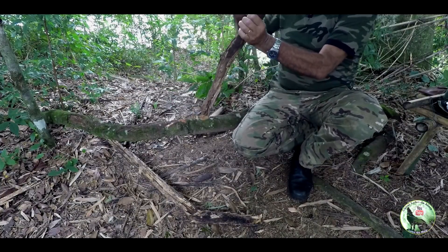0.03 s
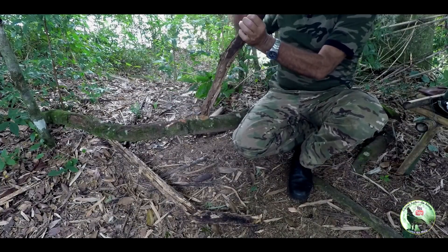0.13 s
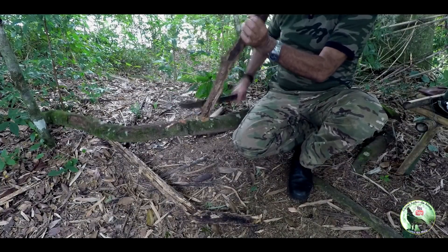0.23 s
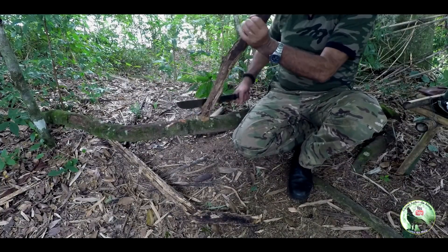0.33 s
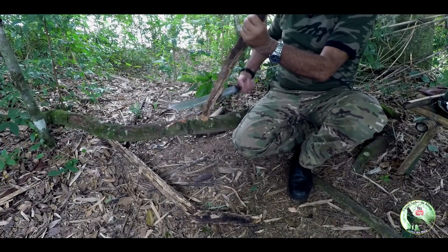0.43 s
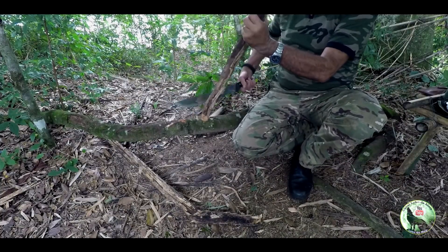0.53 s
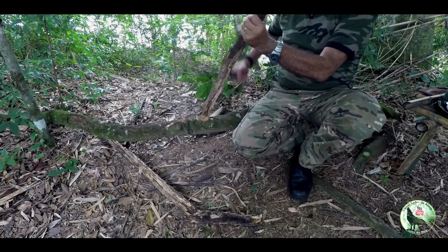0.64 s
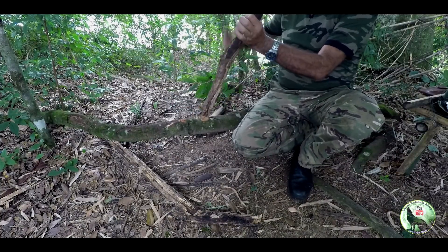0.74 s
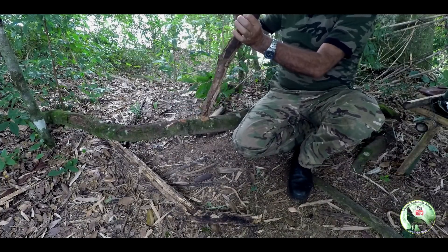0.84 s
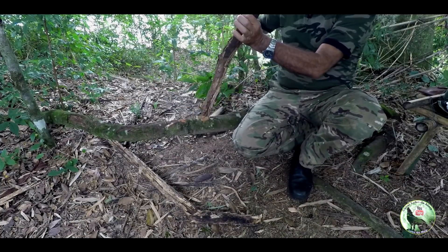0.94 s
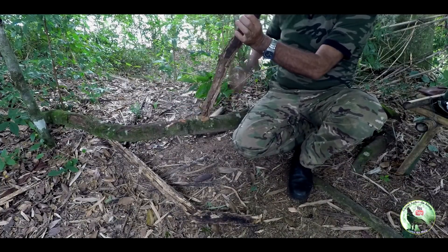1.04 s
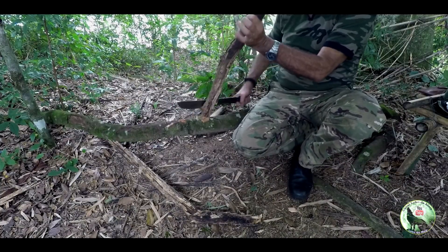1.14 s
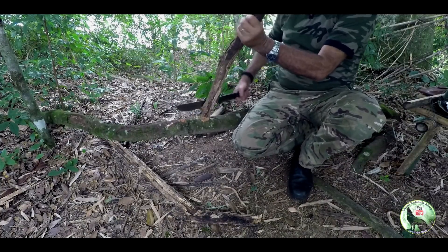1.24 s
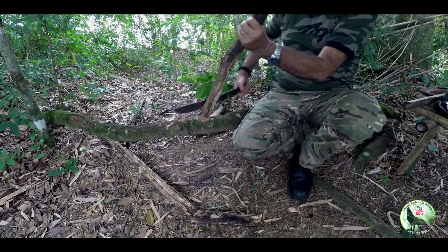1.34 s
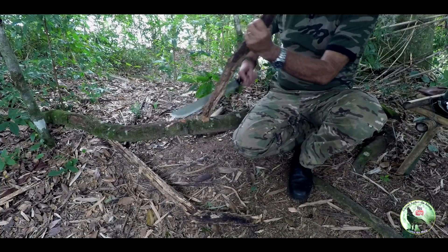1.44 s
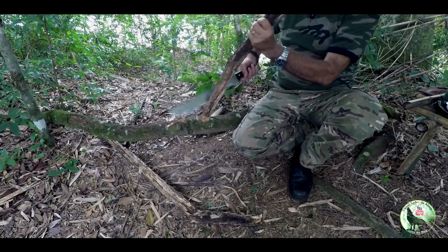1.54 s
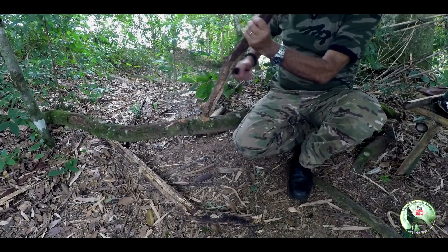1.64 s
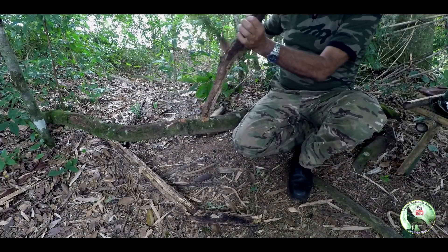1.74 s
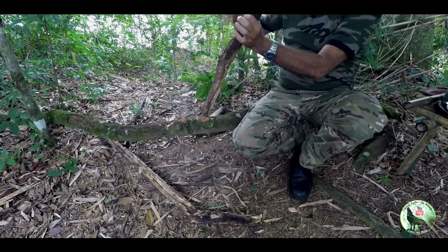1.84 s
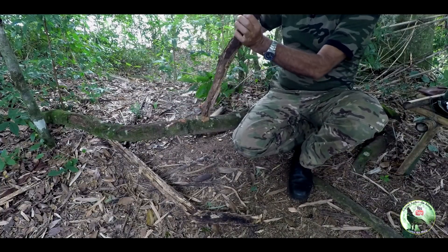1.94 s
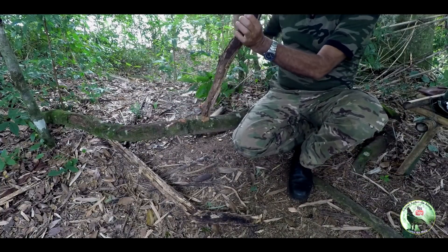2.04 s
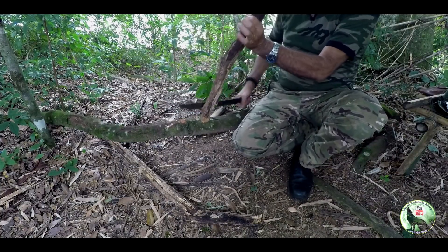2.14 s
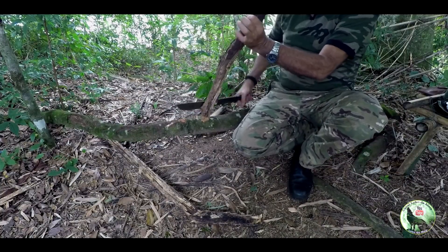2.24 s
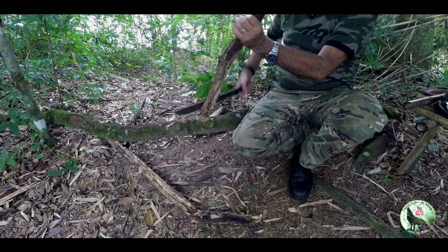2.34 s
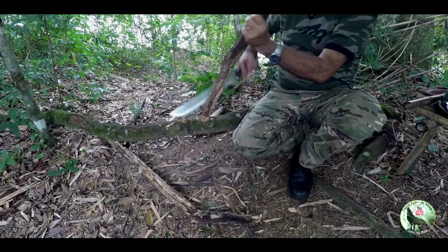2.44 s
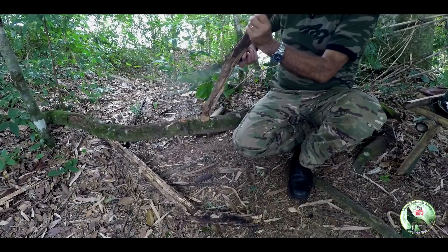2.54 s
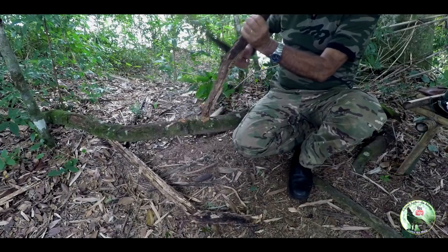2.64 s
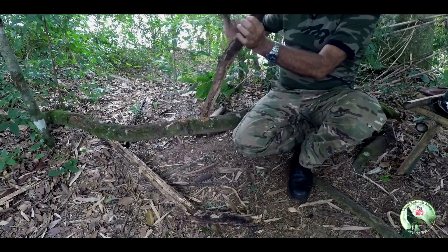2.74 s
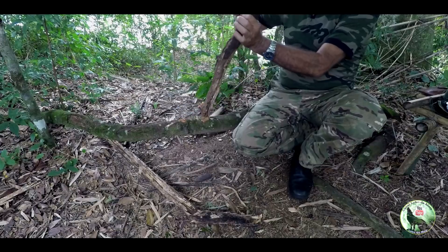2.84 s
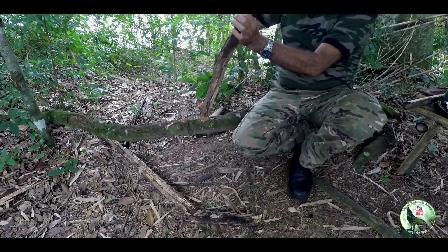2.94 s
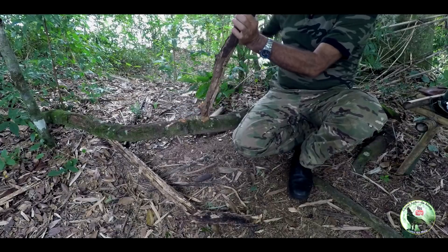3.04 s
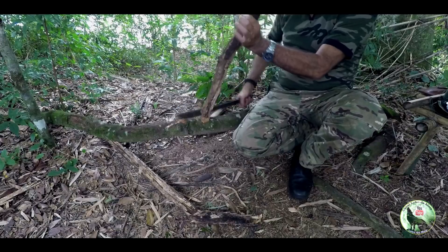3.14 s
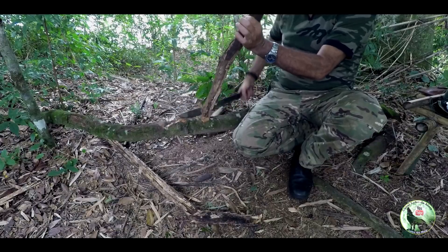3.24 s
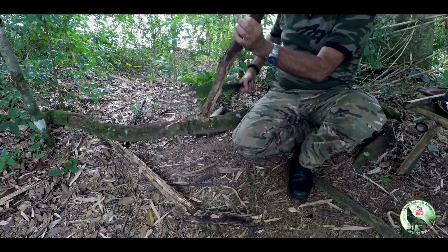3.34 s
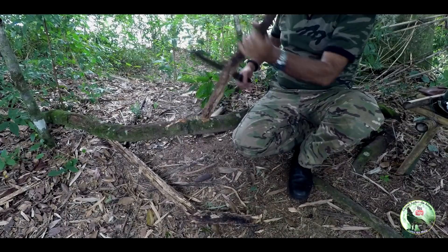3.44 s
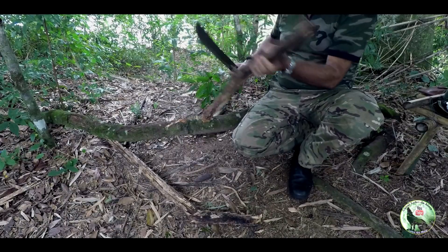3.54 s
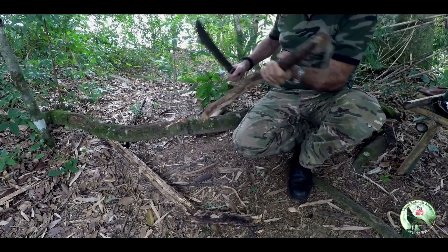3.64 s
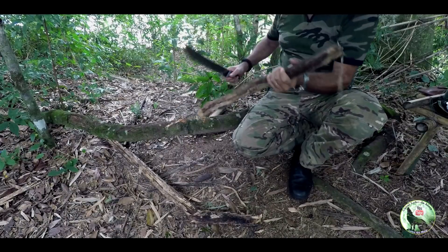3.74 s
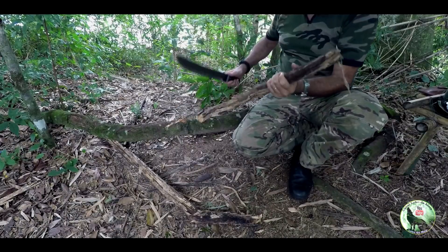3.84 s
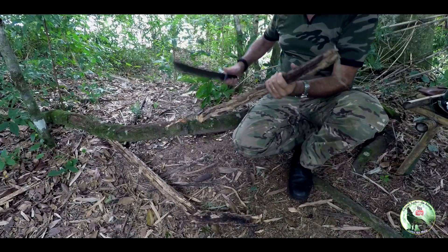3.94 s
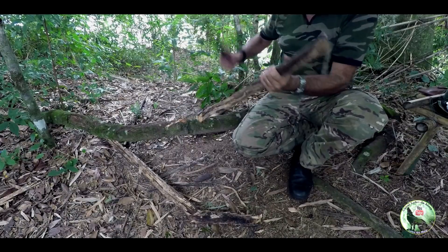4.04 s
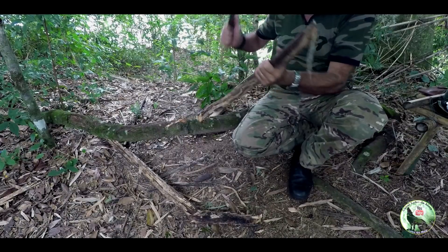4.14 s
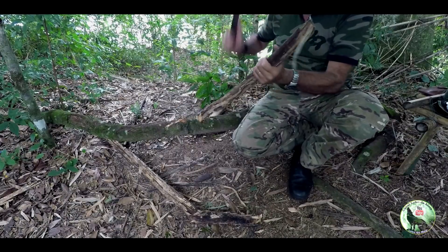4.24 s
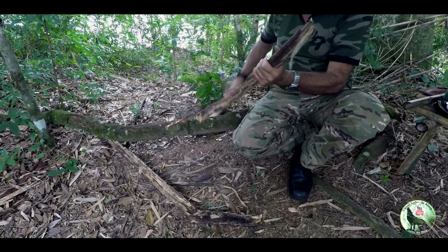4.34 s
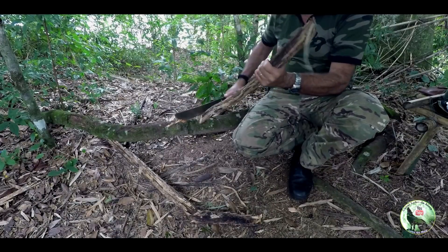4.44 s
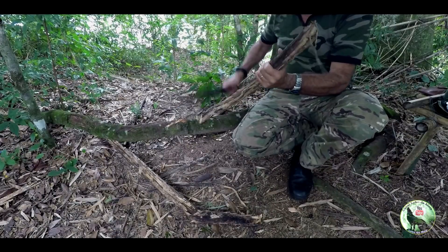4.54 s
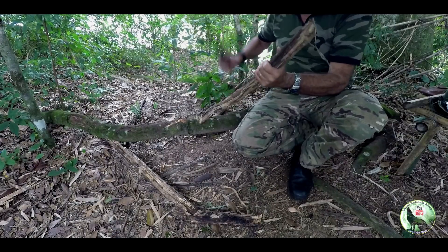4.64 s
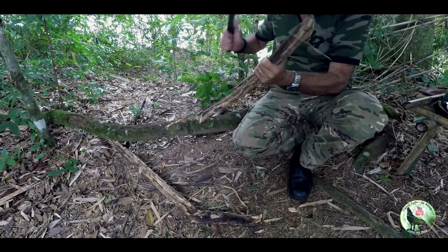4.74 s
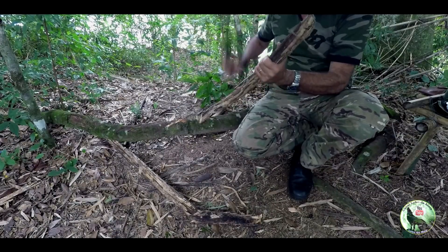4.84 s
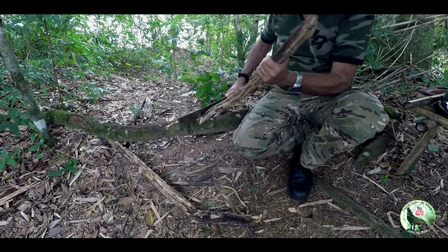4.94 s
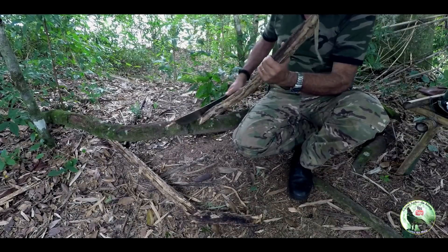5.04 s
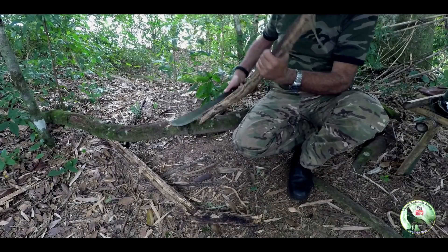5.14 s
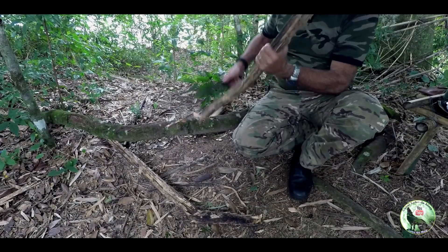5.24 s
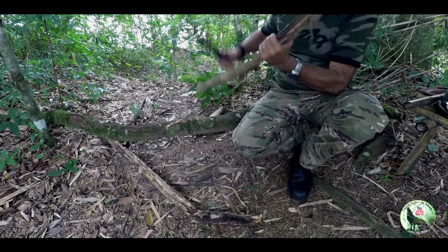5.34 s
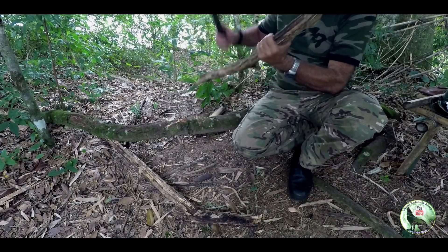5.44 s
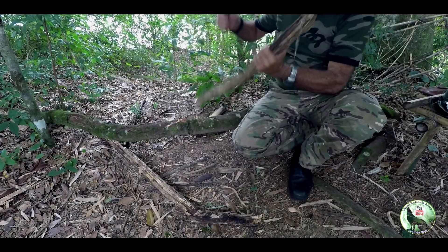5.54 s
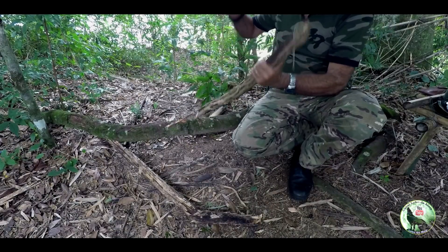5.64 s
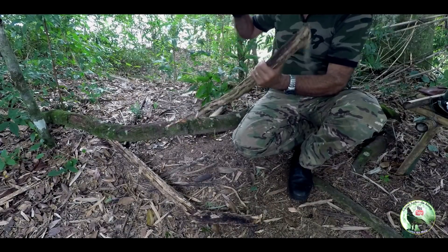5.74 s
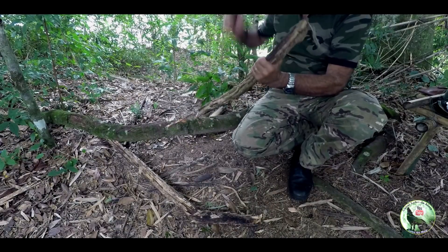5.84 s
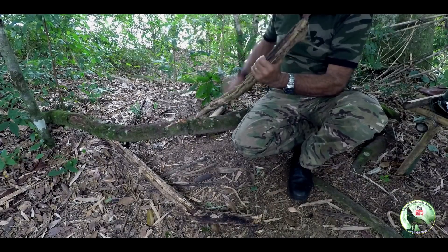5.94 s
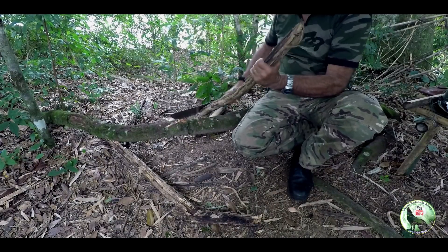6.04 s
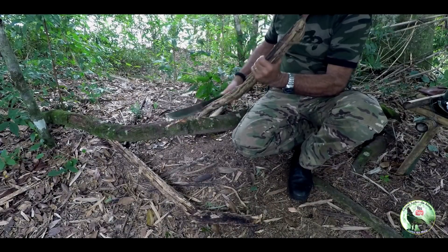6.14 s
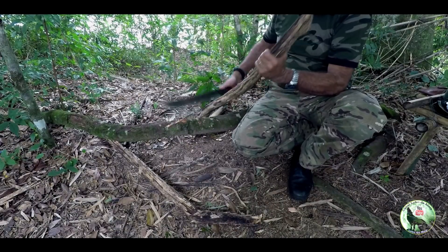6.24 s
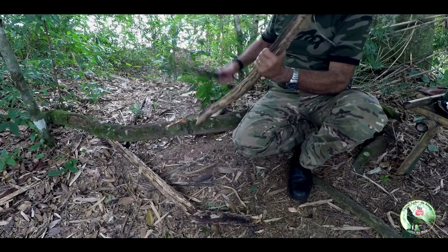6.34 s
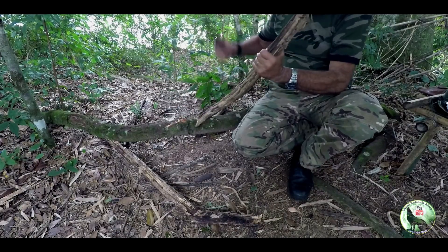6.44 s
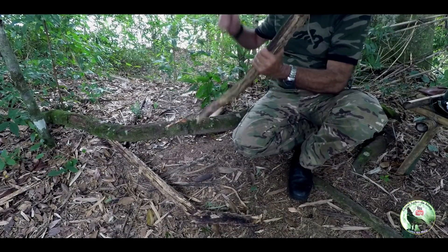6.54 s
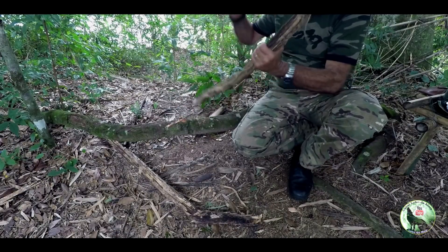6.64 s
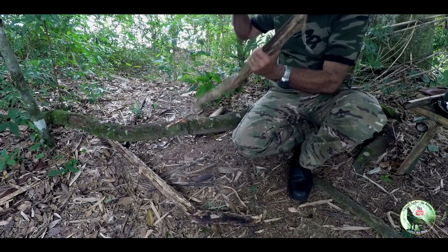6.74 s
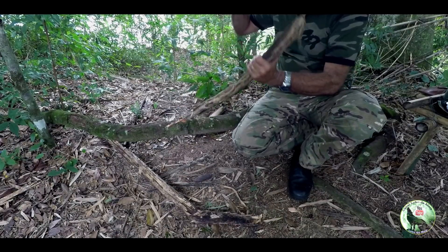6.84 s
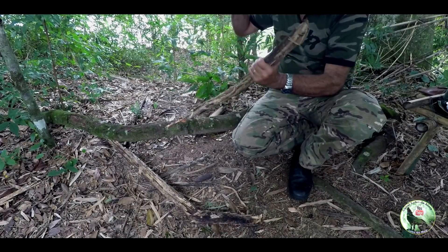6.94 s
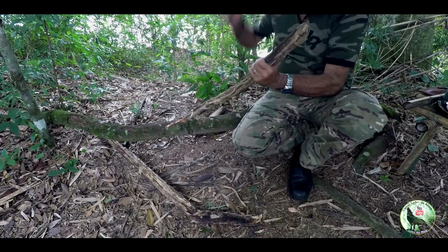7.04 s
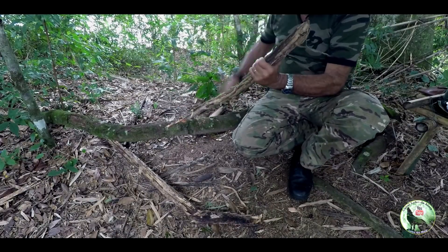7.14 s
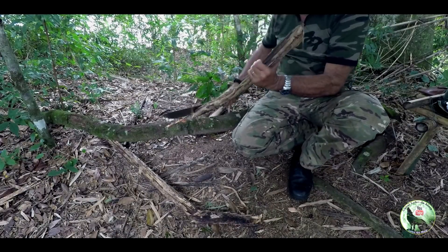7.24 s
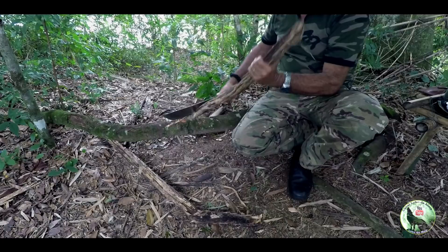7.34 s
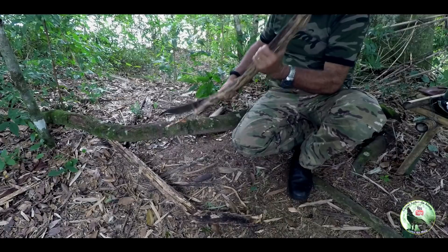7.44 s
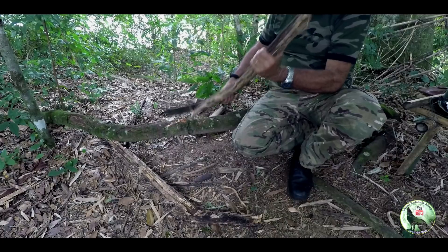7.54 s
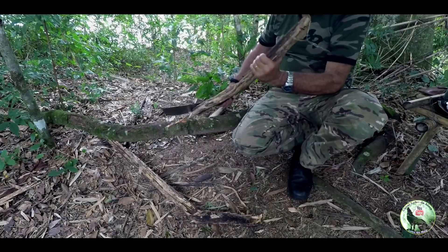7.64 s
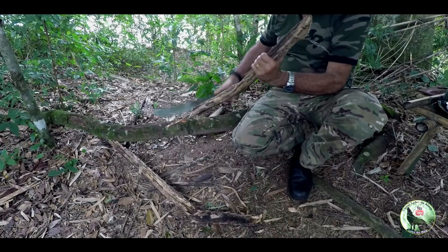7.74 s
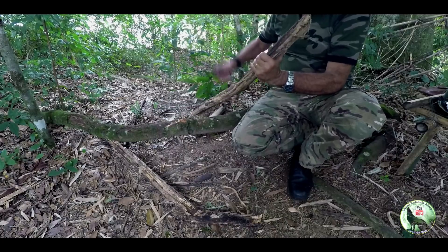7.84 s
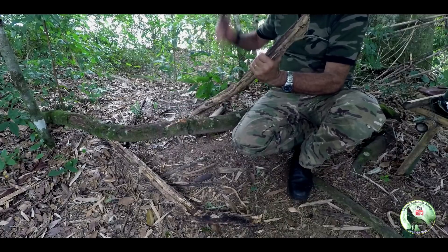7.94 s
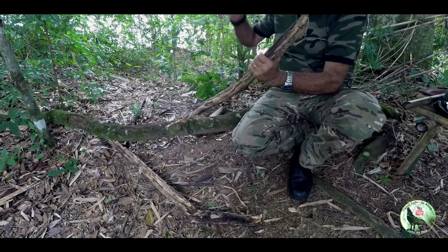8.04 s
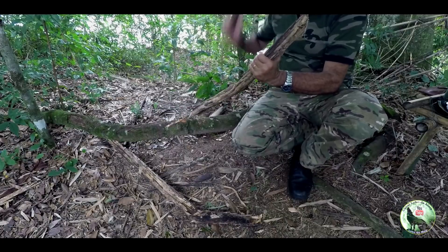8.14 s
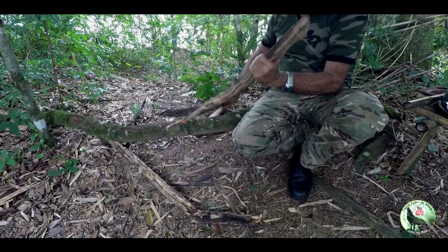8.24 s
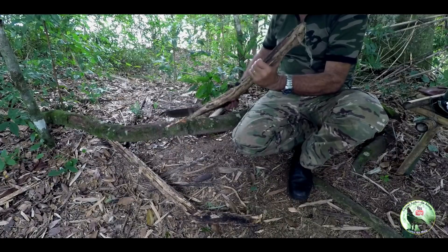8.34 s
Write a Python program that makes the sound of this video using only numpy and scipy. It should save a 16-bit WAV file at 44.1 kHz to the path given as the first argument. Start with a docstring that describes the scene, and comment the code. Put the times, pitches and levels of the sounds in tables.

```python
"""A low rumble and leaf hiss of a forest, shaped noise, last throughout while a machete swishes and chops a
hard stick that rests on a fallen log. Snapping fibres, as noise bursts, ring the stick; damped modes sound the
blade, log and ground; decaying noise is the trunks' answer. Filtered ticks and spiky noise are chips and crumbs
on dry leaves, and later the stick scraping, with one faint tick just before the fifth chop. The stick's end
knocks the log now and then, far birds whistle as gliding sines, and the microphone clips on the blows."""
import sys
import numpy as np
from scipy import signal
from scipy.fft import rfft, irfft, next_fast_len
from scipy.io import wavfile
from scipy.ndimage import map_coordinates

SR = 44100
rng = np.random.default_rng(int(sys.argv[2]) if len(sys.argv) > 2 else 0)


def wav_record(signal):
    """Record a signal, one row per channel, as 16-bit PCM in the file named by sys.argv[1]."""
    frames = np.transpose(np.atleast_2d(signal))
    bounded = np.clip(frames, -1, 1)
    # unit amplitude maps onto the largest positive 16-bit level
    quanta = np.round(bounded * 32767).astype(np.int16)
    wavfile.write(sys.argv[1], SR, quanta)


N = 369999  # samples in the scene


def amp(db):
    """Logarithmic level: decibels to an amplitude ratio."""
    return 10 ** (np.asarray(db) / 20)


def unit(x):
    """Normalisation to rms 1."""
    return x / np.sqrt(np.mean(x ** 2) + 1e-20)


def along(points, hz):
    """Interpolation of (f/Hz, value) points on a logarithmic frequency axis."""
    f, v = np.transpose(points)
    return np.interp(np.log(hz + 1), np.log(f + 1), v)


def filtered(x, response):
    """Linear filtering: the spectrum of x times a complex response of frequency."""
    m = next_fast_len(len(x) + 8192)
    spectrum = rfft(x, m) * response(np.fft.rfftfreq(m, 1 / SR))
    return irfft(spectrum, m)[:len(x)]


def peak(f, hz, width_hz):
    """Simple resonance: the causal response of one damped oscillator, 1 at its centre."""
    return 1j * f * width_hz / (hz * hz - f * f + 1j * f * width_hz)


def noise(n, spectrum):
    """Spectral shaping: white noise coloured by (f/Hz, level/dB) points, at rms 1."""
    return unit(filtered(rng.standard_normal(n), lambda f: amp(along(spectrum, f))))


def wobble(knots_per_s):
    """Slow fluctuation: a smooth random curve through random knots."""
    knots = rng.standard_normal(int(N * knots_per_s / SR) + 4)
    return map_coordinates(knots, [np.arange(N) * knots_per_s / SR])


def near(hz, centre, share=.06):
    """Frequency ratio: true within a logarithmic share of the centre."""
    return abs(np.log(hz / centre)) < share


def ring(modes, t, attack_s, spread_db, blur):
    """Modal decay: damped modes at new strengths for each blow; the grip blurs each by a wandering phase."""
    total = 0
    for hz, db, t60 in modes:
        phase = 2 * np.pi * hz * t + blur * np.sqrt(hz / SR) * np.cumsum(rng.standard_normal(len(t)))
        decay = amp(db + spread_db * rng.standard_normal() - 60 * t / t60)
        total = total + decay * np.sin(phase)
    return (1 - np.exp(-t / attack_s)) * total


def add(out, s, x):
    """Superposition: mix x into out from time s in seconds."""
    i = max(round(s * SR), 0)
    out[i:i + len(x)] += x[:len(out) - i]


# spectrum of the distant rumble: (f/Hz, relative level/dB)
RUMBLE = [(12, -30), (20, 6.5), (36, 4), (65, -2.5), (102, 0.5), (133, -3.5), (145, -18), (172, -8.5),
          (211, -22), (242, -20), (300, -20.5), (390, -49.5), (660, -120)]
# spectrum of the leaf hiss: (f/Hz, relative level/dB)
LEAVES = [(120, -33.5), (200, -1.5), (244, -10.5), (315, -7), (544, -8.5), (574, -10.5), (702, -10),
          (956, -12), (1090, -12), (2170, -16.5), (4100, -17), (5480, -19.5), (6700, -20), (7740, -26.5),
          (15500, -35)]
# slow level of a low drone: (t/s, rms level/dB)
DRONE = [(0, -51), (.67, -51), (2.0, -50.5), (2.7, -58), (3.9, -46.5), (4.8, -56), (6.8, -50), (7.4, -54),
         (8.39, -53.5)]
# slow level of a fainter hum above the drone: (t/s, rms level/dB)
HUM = [(0, -65.5), (3.5, -66.5), (3.9, -64), (5.0, -68), (5.5, -61), (6.3, -60), (6.7, -67), (8.39, -67)]
RUMBLE_DB, RUMBLE_GROWS_DB, HISS_DB = -51.5, 5, -55  # the rumble gains a little over the scene
DRONE_HZ, DRONE_WANDER_HZ = 101.4, 9


def forest():
    """Broadband and narrowband noise: a distant rumble, a wandering drone, a hum and a smooth hiss of leaves."""
    t = np.arange(N) / SR
    rumble_db = RUMBLE_DB + RUMBLE_GROWS_DB * t / t[-1] + 1.2 * wobble(2.5)
    rumble = amp(rumble_db) * noise(N, RUMBLE)
    # slow noise as the amplitude of a sine spreads it into a narrow band
    drone_hz = DRONE_HZ + DRONE_WANDER_HZ * wobble(2.1)
    slow = unit(filtered(rng.standard_normal(N), lambda f: 1 / (1 + (f / 22) ** 4)))
    drone = np.sqrt(2) * slow * np.sin(2 * np.pi * np.cumsum(drone_hz) / SR)
    drone *= amp(np.interp(t, *np.transpose(DRONE)))
    hum = unit(filtered(rng.standard_normal(N), lambda f: peak(f, 242, 25) ** 2))
    hum *= amp(np.interp(t, *np.transpose(HUM)))
    hiss = amp(HISS_DB + .4 * wobble(1.5)) * noise(N, LEAVES)
    return rumble + drone + hum + hiss


# whistled notes: (t/s, length/s, first f/Hz, last f/Hz, level/dB, hold before the faint tail/s)
BIRDS = [(.49, .08, 4350, 4450, -60, .03), (.5, .025, 4600, 4950, -60, .025),
         (.512, .23, 5295, 5300, -54, .1), (.572, .18, 4700, 2900, -63, .13),
         (2.455, .43, 5575, 5530, -51, .13), (2.51, .11, 6105, 6110, -66, .08),
         (4.48, .1, 4500, 4550, -63, .1), (4.5, .25, 5305, 5305, -58, .1), (4.58, .14, 4500, 2850, -64, .1),
         (7.76, .07, 6100, 6070, -69, .05), (7.76, .07, 6500, 6540, -69, .04)]
BIRD_TAIL_DB, BIRD_TAIL_S = -13, .04  # after the hold a note sinks to a faint tail


def birds():
    """Frequency modulation and scattering: thin gliding whistles with soft ends, smeared by the trees."""
    whistles = np.zeros(N)
    for s, length, first_hz, last_hz, db, held in BIRDS:
        t = np.arange(0, length, 1 / SR)
        ends = np.clip(np.minimum(t, length - t) / 0.0074, 0, 1)
        level_db = db + BIRD_TAIL_DB * np.clip((t - held) / BIRD_TAIL_S, 0, 1)
        rough = .012 + .075 * (first_hz - last_hz > 1000)  # long falling glides are hoarse
        hz = first_hz + (last_hz - first_hz) * t / length
        phase = np.cumsum(2 * np.pi * hz / SR + rough * rng.standard_normal(len(t)))
        add(whistles, s, np.sqrt(2) * ends * amp(level_db) * np.sin(phase))
    whistles *= amp(1.5 * wobble(60))
    t = np.arange(SR // 4) / SR
    tail = rng.standard_normal(len(t)) * amp(-60 * t / 0.28)
    smeared = signal.fftconvolve(whistles, tail / np.linalg.norm(tail))[:N]
    return whistles + amp(-5) * smeared


# chips and splinters landing, the stick scraping in the faint-crackle ticks after 6 s, and a faint tick just
# before the fifth chop: (t/s, level/dB, pitch f/Hz, relative bandwidth, crackle level/dB)
TICKS = [(0.4535, -22.5, 3440, 1.7, -20), (0.472, -24.5, 1170, 1.7, -24), (0.6185, -21.5, 5500, 0.53, -24),
         (.665, -38, 1500, 0.7, -12), (0.681, -44, 12000, 0.68, -7), (.763, -26, 4870, 0.59, -11),
         (0.8306, -38, 5970, 0.44, -15.5), (0.9314, -33.5, 2480, 1.7, -18), (1.4078, -17.5, 5950, 2.3, -23),
         (1.4345, -26, 3500, 1.7, -7), (1.446, -24.5, 2090, 2, -11), (1.465, -33, 1970, 0.15, -31),
         (1.487, -34, 1960, .4, -23), (2.4127, -33, 4000, 1, -6.5), (2.463, -31, 1290, 0.91, -18),
         (2.6494, -36.5, 4300, 0.48, -18), (3.2126, -20, 1500, 0.88, -14), (3.25, -18.5, 2160, 2.7, -27),
         (3.297, -29, 2180, 0.7, -25), (3.374, -26, 6640, .6, -17), (3.38, -22.5, 2200, 1.9, -24),
         (3.5612, -23, 4970, 0.24, -26), (3.856, -38, 1217, .2, -31), (4.388, -35, 3300, .5, -23),
         (4.437, -24, 5500, .6, -8), (4.716, -36.5, 6800, 0.61, -2.5), (5.1183, -29, 2660, 0.75, -19),
         (5.179, -32.5, 3450, 0.97, -20), (5.574, -31.5, 1900, 0.78, -16), (6.194, -36, 4260, 0.62, -12),
         (6.298, -25, 2070, 1.05, -35), (6.3693, -28, 2300, 0.76, -33), (6.373, -32, 1190, 0.23, -44),
         (6.404, -34, 2000, 1.1, -30), (6.4165, -28.5, 1950, 0.97, -32), (6.85, -44, 1810, 1.4, -8),
         (7.612, -26, 1490, 1.8, -33), (7.738, -34.5, 893, 0.72, -30.5), (7.7538, -37, 1310, 0.19, -36),
         (7.757, -29, 1700, 0.34, -31.5)]
TICK_CYCLES = 59  # the noise behind a tick dies 60 dB in this many cycles of its pitch


def ticks():
    """Impact excitation: a short noise tick resonates at its own pitch, with a broad crackle."""
    out, t = np.zeros(N), np.arange(SR // 8) / SR
    for s, db, hz, width, crackle_db in TICKS:
        tick = rng.standard_normal(len(t)) * amp(-60 * t * hz / TICK_CYCLES) * (1 - np.exp(-t / 0.0003))
        tick = filtered(tick, lambda f: peak(f, hz, 0.91 * width * hz) ** 2
                        + amp(crackle_db) * peak(f, 7200, 9000) ** 2)
        start_rms = np.sqrt(np.mean(tick[:130] ** 2))
        add(out, s, amp(db - 15) * tick / start_rms)
    return out


# showers of crumbs on the leaves: (t/s, level/dB, length/s, pitch f/Hz)
SHOWERS = [(0.44, -45.5, 0.061, 4000), (1.399, -47, 0.018, 4900), (1.417, -45.5, 0.051, 4270),
           (1.485, -51, .015, 4800), (2.439, -50.5, 0.033, 2540), (3.199, -36, 0.034, 5500),
           (3.37, -39, 0.038, 6340), (3.423, -56, 0.086, 7760), (3.531, -57, 0.037, 9800),
           (3.552, -49.5, 0.056, 4620), (3.688, -57.5, 0.095, 4980), (3.757, -54, 0.013, 8800),
           (6.22, -53, 0.069, 1600), (6.371, -50, 0.027, 2120), (7.62, -50.5, 0.02, 3010),
           (7.721, -57.5, 0.036, 2480)]


def crumbs():
    """Granular superposition: spiky, clumped noise through a broad resonance is a shower of tiny impacts."""
    out, n = np.zeros(N), SR // 8 * 2
    for s, db, length, hz in SHOWERS:
        spikes = rng.standard_normal(n) * amp(1.5 * rng.exponential(size=n))
        clumps = amp(2 * np.repeat(rng.standard_normal(n // 128 + 1), 128)[:n])
        grains = unit(filtered(spikes * clumps, lambda f: peak(f, hz, 1.3 * hz) ** 2))
        u = np.arange(n) / SR / length
        add(out, s, amp(db) * grains * np.minimum(u * 8, 1) / (1 + u ** 4))
    return out


# modes of the fallen log, before each blow's shifts: (f/Hz, level/dB, t60/s)
LOG = [(151.2, -2, 0.19), (217, -4.5, 0.071), (250, -6, 0.089), (316, -9.5, 0.052), (359, -3, 0.056),
       (421, -7.5, 0.08), (546, -2, .05), (778, -4, 0.017)]


def log_ring(t, attack_s, upper_db, spread_db, blur, favoured_hz=None):
    """Modal excitation: the blow sets the upper modes' level and may favour modes near one frequency by 5.5 dB."""
    modes = []
    for hz, level, t60 in LOG:
        favour_db = 5.5 * near(hz, favoured_hz, .14) if favoured_hz else 0
        modes.append((hz, level + upper_db * (hz > 190) + favour_db, t60))
    return ring(modes, t, attack_s, spread_db, blur)


# the stick's end set down on the log: (t/s, level/dB, contact/ms, log level/dB)
KNOCKS = [(3.853, -34, 0.56, -11.5), (5.64, -13.5, 0.25, -12), (6.831, -13, 0.61, -11.5),
          (7.612, -37.5, 0.47, -6)]


def knocks():
    """Contact time: one short blunt push rings the stick and the log, with a rough rattle after it."""
    out, t = np.zeros(N), np.arange(SR // 4) / SR
    for s, db, contact_ms, log_db in KNOCKS:
        push = np.exp(-((t - .001) / (contact_ms / 4000)) ** 2)
        tap = filtered(push, lambda f: peak(f, 2150, 880) - amp(5.5) * peak(f, 1070, 445))
        rattle = unit(filtered(rng.standard_normal(len(t)), lambda f: peak(f, 1440, 1210) ** 2))
        rattle *= amp(-60 * t / 0.079)
        thud = log_ring(t, 0.0035, upper_db=7.5, spread_db=4.0, blur=0.17)
        add(out, s, amp(db) * (tap / np.abs(tap).max() + amp(log_db) * thud + amp(-18.5) * rattle))
    return out


# spectrum of the near trunks' answer: (f/Hz, relative level/dB)
NEAR_TRUNKS = [(200, -14), (800, -4.5), (2000, -6), (4500, -4.5), (7000, -6.5), (10000, -14), (15000, -16)]
# spectrum of the far trunks' answer: (f/Hz, relative level/dB)
FAR_TRUNKS = [(200, -23.5), (800, -10), (2000, -4.5), (3200, -2), (4800, -1), (7000, -4), (10000, -11),
              (15000, -17)]


def echo(t, t60, bass_db, treble_db, body):
    """Scattering: near trunks die fast, far ones slowly, in uneven arrivals that keep the blow's colour."""
    uneven = amp(1.3 * map_coordinates(rng.standard_normal(64), [t * 110], mode="wrap"))
    colour = unit(signal.fftconvolve(noise(len(t), FAR_TRUNKS), body[:1200])[:len(t)])
    near_part = amp(-60 * t / (0.24 * t60)) * noise(len(t), NEAR_TRUNKS)
    far_part = amp(-16.5 - 60 * t / t60) * (noise(len(t), FAR_TRUNKS) + amp(-0.5) * colour) * uneven

    def tilt(f):
        treble_octaves = np.clip(np.log2(f / 5000 + .01), 0, 1.5)
        bass_octaves = np.clip(np.log2(3000 / (f + 1)), 0, 1.5)
        return amp(treble_db * treble_octaves + bass_db * bass_octaves)
    return (1 - np.exp(-(t / .002) ** 2)) * filtered(near_part + far_part, tilt)


# modes of the soil, before each chop's share of ring time: (f/Hz, level/dB, t60/s)
GROUND = [(44, -1, 0.97), (56.5, -2.5, 0.29), (65, 0, 0.58), (88, -5.5, 0.081)]


def ground_ring(t, ring_share):
    """Low-frequency modal decay: the soil swells slowly and booms under the log."""
    soil = [(hz, level, t60 * ring_share) for hz, level, t60 in GROUND]
    return ring(soil, t, .012, spread_db=4.0, blur=0.45)


def swish(t):
    """Eddy shedding: as the blade speeds up, its noise swells and rises in pitch."""
    low = unit(filtered(rng.standard_normal(len(t)), lambda f: peak(f, 700, 350) ** 2))
    high = unit(filtered(rng.standard_normal(len(t)), lambda f: peak(f, 1300, 650) ** 2))
    speed = t / t[-1]
    return speed ** 4.7 * ((1 - speed) * low + speed * high)


# modes of the steel blade: (f/Hz, level/dB, t60/s)
BLADE = [(1285, -3.5, 0.27), (1700, -8.5, .2), (2670, -6, .3), (3450, -11, 0.26), (4370, -8.5, .3),
         (4720, -10.5, .35), (5000, -7, .35), (5640, -3.5, .25), (6370, -11.5, 0.34), (7400, -7.5, .25),
         (8300, -10.5, .15), (9500, -7, .18)]


def blade_ring(t, hz_a, boost_a_db, hz_b):
    """Selective modal excitation: each blow brings out the steel's modes near two frequencies."""
    steel = []
    for hz, level, t60 in BLADE:
        boost_db = boost_a_db * near(hz, hz_a) + 7 * near(hz, hz_b)
        steel.append((hz, level - 5.0 + boost_db, t60))
    return ring(steel, t, .002, spread_db=2.5, blur=.38)


# resonances of the stick: (f/Hz, width/Hz, level/dB)
STICK = [(713, 85, -11.5), (1035, 150, -8.5), (1280, 200, -1.5), (1982, 170, -0.5), (2500, 280, -1),
         (3650, 610, 2), (4624, 630, 4), (5370, 2100, 0)]


def bite(t, bite_ms, low_db, upper_db, top_db):
    """Forced resonance: fibres snap while the edge bites and ring the stick; returns wood at rms 1, and snaps."""
    u = t / (bite_ms / 1000)
    # sharp contact first, then the wedge sinks in
    edge = rng.standard_normal(len(t)) * (1 - np.exp(-t / 0.00045)) / (1 + (1.2 * u) ** 4)
    wedge = rng.standard_normal(len(t)) * (1 - np.exp(-(4.6 * u) ** 2)) / (1 + u ** 5)
    body = 0
    for k, (hz, width_hz, level) in enumerate(STICK):
        share_db = low_db if hz < 1150 else upper_db if 2300 < hz < 3200 else top_db if hz > 3200 else 0
        mode = filtered(edge if hz > 2300 else wedge, lambda f: peak(f, hz, width_hz))
        body = body + (-1) ** k * amp(level + share_db) * mode / np.linalg.norm(mode)
    return body / np.sqrt(np.mean(body[u < 1.3] ** 2)), edge  # rms taken over the bite


# the wood gives again just before or after a chop: (t/s, level/dB, length/ms, upper and top wood level/dB)
SPLITS = [(1.127, -5.5, 3.9, -7.5), (3.1615, -9, 6.5, 8.5), (3.174, -4, 3.3, -5.5),
          (3.177, -4.5, 4.75, -1.5), (4.41, -14.5, 6.7, -12.5), (7.216, -9.5, 5.4, -11)]


def splits():
    """Secondary fracture: a further burst of snapping fibres rings the stick again."""
    out, t = np.zeros(N), np.arange(SR // 10) / SR
    for s, db, length_ms, upper_db in SPLITS:
        body, _ = bite(t, length_ms, 0, upper_db, upper_db)
        add(out, s, amp(db - 10) * body)
    return out


# chops: (t/s, level/dB, bite/ms, low wood level/dB, upper wood level/dB, top wood level/dB,
#         crack level/dB, blade level/dB, favoured blade f/Hz, its boost level/dB, second blade f/Hz,
#         favoured log f/Hz, swish level/dB, crack f/Hz, upper log level/dB, far echo t60/s,
#         share of the ground's ring time)
CHOPS = [(0.2817, 0, 7.7, 2, -4, -7.5, -4.5, -32, 10080, 15, 7400, 470, -48, 19000, -3.5, 0.34, 0.75),
         (1.1182, 2.5, 5.7, 2.5, 1, 0.5, -13.5, -37, 5750, 12, 4300, 340, -46, 10970, 0.5, 0.42, 0.81),
         (2.1688, 1.5, 10.5, 5.5, 10, 7.5, -18.5, -31, 5000, 9, 4450, 420, -56, 12000, -2.5, 0.45, 0.82),
         (3.1658, 2.5, 4.7, 3, 2, 4, -15.5, -30.5, 5600, 5, 6480, 250, -50.5, 11000, 0.5, 0.45, 0.53),
         (4.4032, -4, 5.6, 5.5, -2, -2, -15, -36.5, 1300, 12.5, 6500, 540, -67.5, 9840, 5, 0.37, 0.67),
         (4.949, -5, 7.4, -4.5, 0.5, 1.5, -11.5, -31, 6480, 18.5, 7400, 340, -49.5, 10500, -3.5, 0.37, 0.82),
         (6.007, -7.5, 8.2, -6.5, -4, -2, -7, -28.5, 1300, 9, 5700, 470, -70, 11480, 5, 0.39, .6),
         (7.209, -2.5, 6.6, 1.5, 0, -4, -3.5, -35.5, 1300, 15, 10080, 205, -44, 8120, 2, 0.39, 0.58),
         (8.293, 0, 6, 4, 2, -0.5, -19, -32.5, 2600, 2.5, 3500, 205, -47, 18100, -6.5, 0.39, 0.87)]
GROUND_DB, GROUND_GROWS, GROUND_DELAY_S = -28.5, .3, .014  # soil follows the blow only weakly (dB per dB)
ECHO_DB, ECHO_GROWS = -16.5, .75  # growth in dB per dB of the blow
ECHO_EDGES_DB, EDGES_PER_UPPER = 1.93, -.4  # echo's bass and treble, dB/octave; sink as upper wood rings more
LOG_DB, LOG_PITCH, LOG_PITCH_SPREAD = -16.5, .96, .04  # the pitch factor varies from blow to blow


def chops():
    """Impact coupling: each bite drives the stick, blade, log and ground, after a swish through the air."""
    out, t = np.zeros(N), np.arange(SR // 2) / SR
    air = t[:SR // 10]
    for (s, db, bite_ms, low_db, upper_db, top_db, crack_db, blade_db, hz_a, boost_a_db, hz_b,
         log_hz, swish_db, crack_hz, upper_log_db, t60, ring_share) in CHOPS:
        body, edge = bite(t, bite_ms, low_db, upper_db, top_db)
        crack = filtered(edge, lambda f: peak(f, crack_hz, 0.78 * crack_hz))
        blow = amp(-5) * body + amp(crack_db) * crack
        blow += amp(blade_db) * blade_ring(t, hz_a, boost_a_db, hz_b)
        pitch = LOG_PITCH + LOG_PITCH_SPREAD * rng.standard_normal()
        blow += amp(LOG_DB) * log_ring(t * pitch, 0.0012, upper_log_db, 2.0, 0.47, log_hz)
        add(out, s, amp(db) * blow)
        edges_db = ECHO_EDGES_DB + EDGES_PER_UPPER * upper_db
        add(out, s, amp(ECHO_DB + ECHO_GROWS * db) * echo(t, t60, edges_db, edges_db, body))
        add(out, s + GROUND_DELAY_S, amp(GROUND_DB + GROUND_GROWS * db) * ground_ring(t, ring_share))
        add(out, s - air[-1], amp(swish_db) * swish(air))  # ends as the blade lands
    return out


def scene():
    """Superposition of all sources."""
    blows = chops() + splits() + knocks()
    return (blows + ticks() + crumbs() + birds() + forest())[None]


TOP_HZ = 15700  # band limit


def record(dry):
    """Saturation and band limiting: the loudest blows clip; the treble droops and is cut at the band limit."""
    clipped = dry[0] / (1 + np.abs(dry[0]) ** 8) ** (1 / 8)

    def treble_edge(f):
        return np.clip((TOP_HZ - f) / 300, 0, 1) / np.sqrt(1 + (f / 14500) ** 12)
    return np.clip(filtered(clipped, treble_edge), -1, 1)[None]


dry = scene()
out = record(dry)
wav_record(out)
```